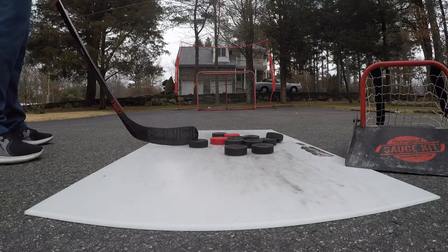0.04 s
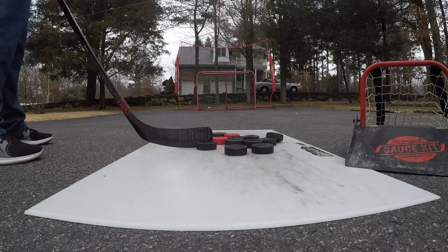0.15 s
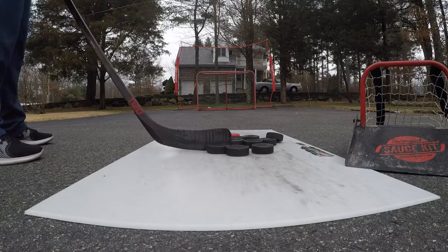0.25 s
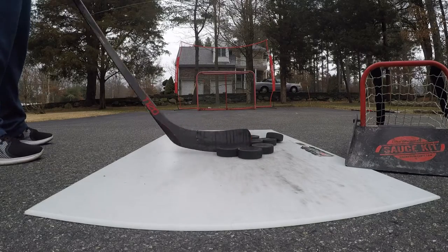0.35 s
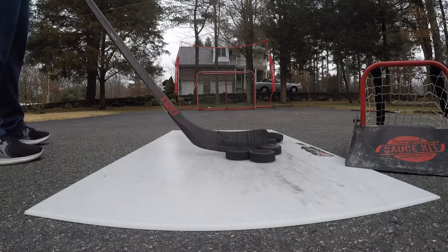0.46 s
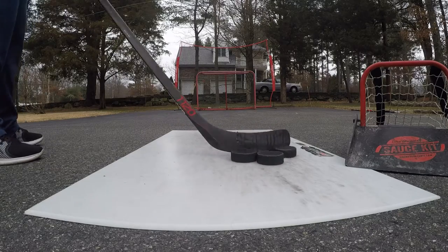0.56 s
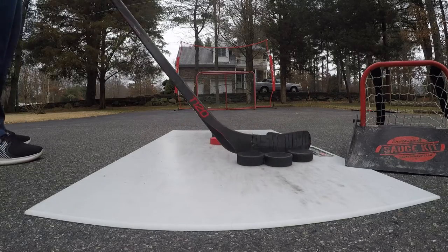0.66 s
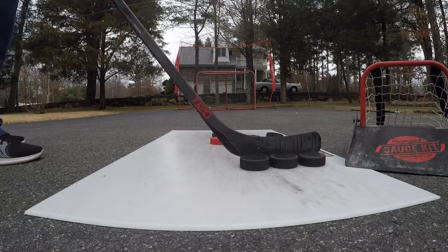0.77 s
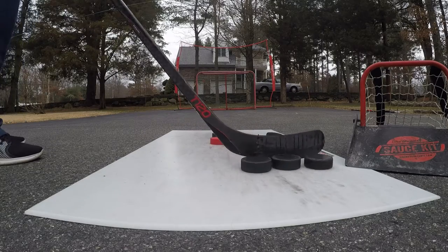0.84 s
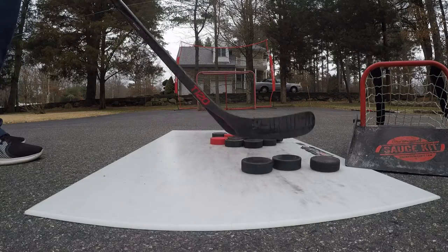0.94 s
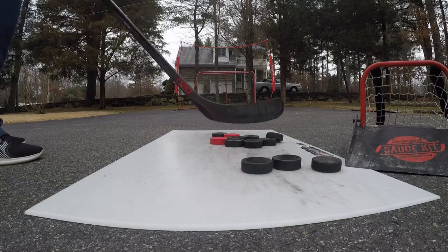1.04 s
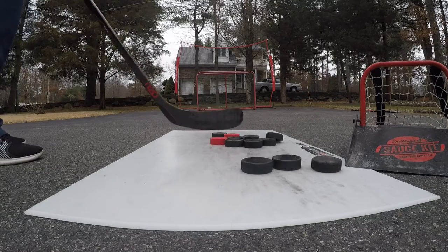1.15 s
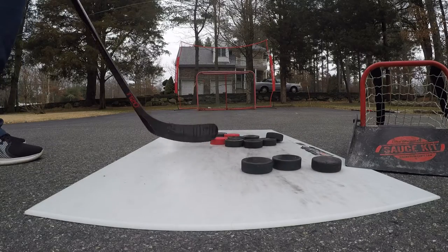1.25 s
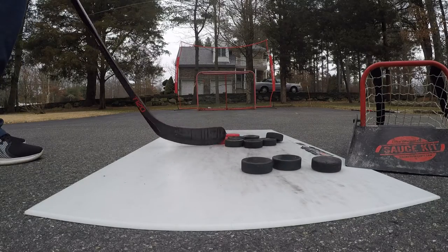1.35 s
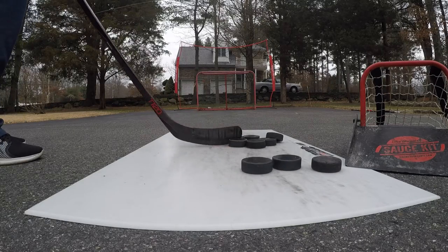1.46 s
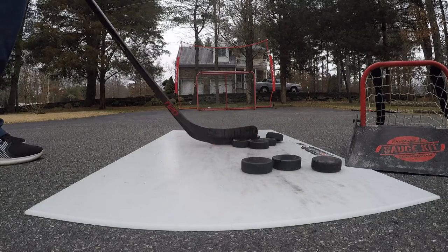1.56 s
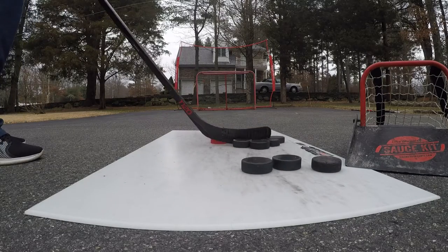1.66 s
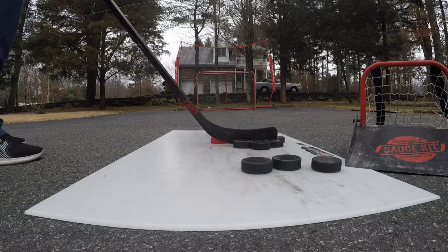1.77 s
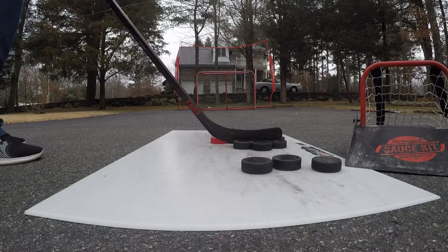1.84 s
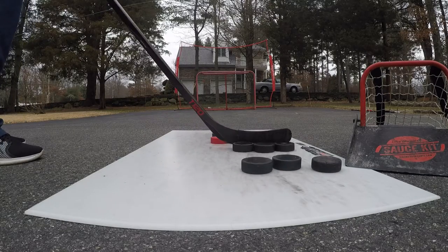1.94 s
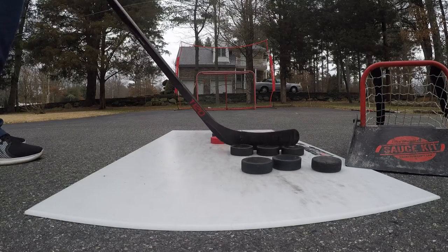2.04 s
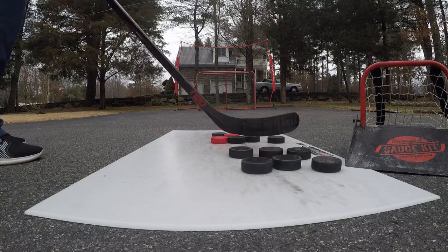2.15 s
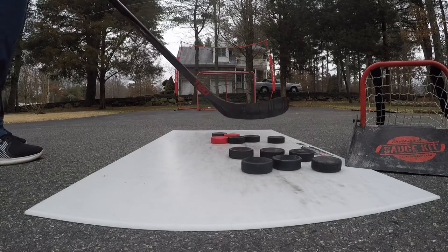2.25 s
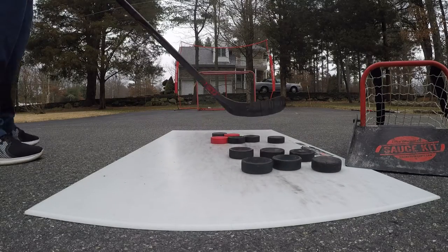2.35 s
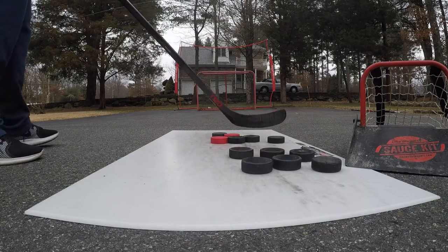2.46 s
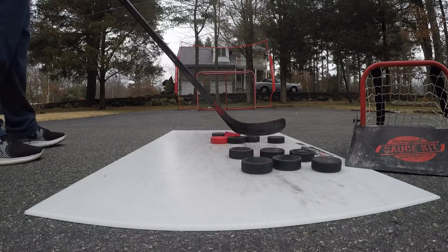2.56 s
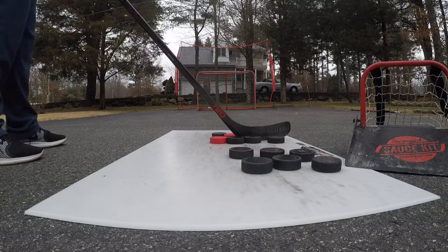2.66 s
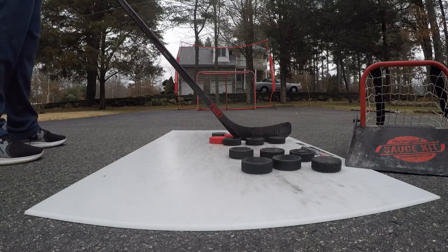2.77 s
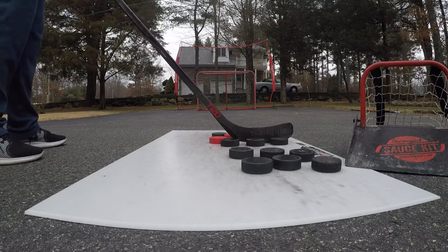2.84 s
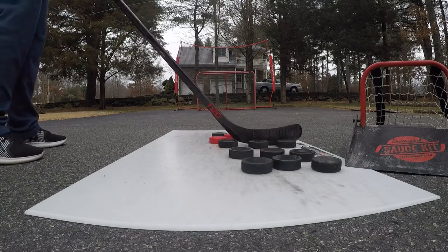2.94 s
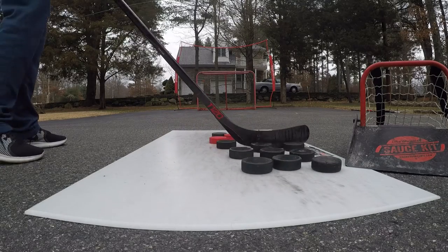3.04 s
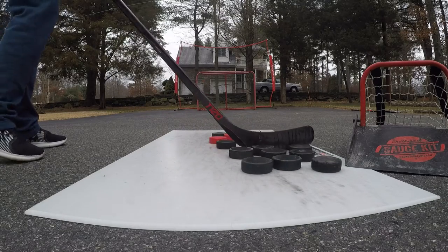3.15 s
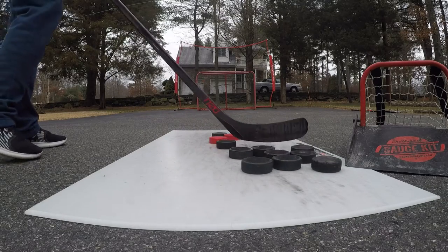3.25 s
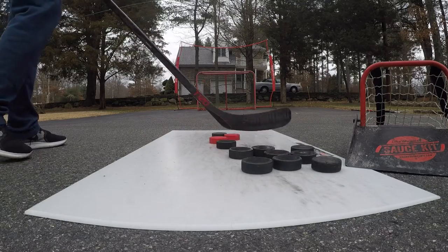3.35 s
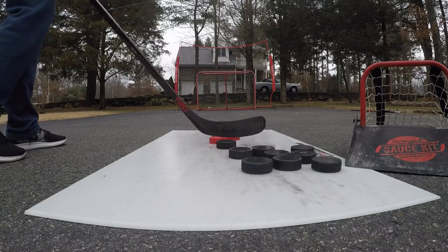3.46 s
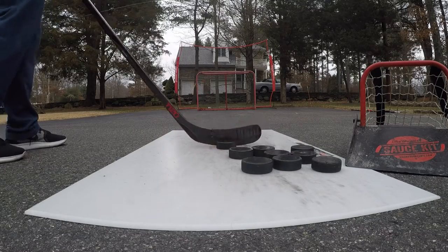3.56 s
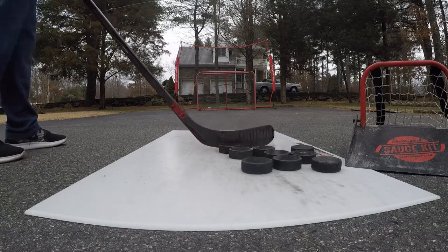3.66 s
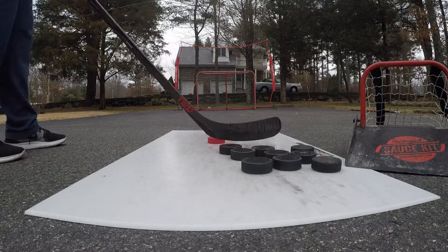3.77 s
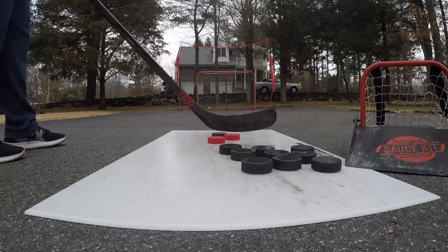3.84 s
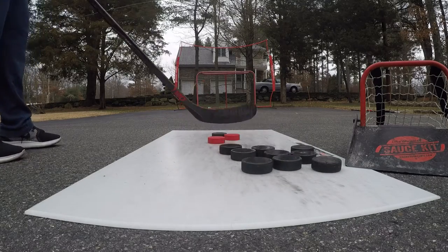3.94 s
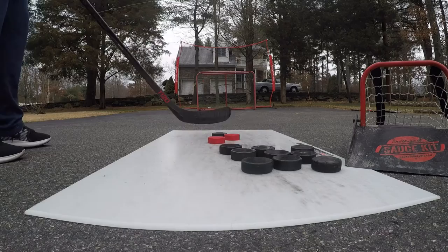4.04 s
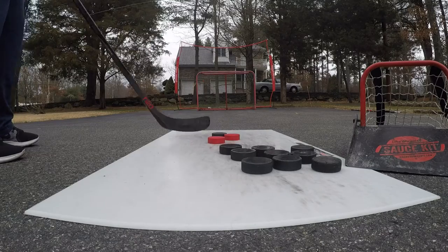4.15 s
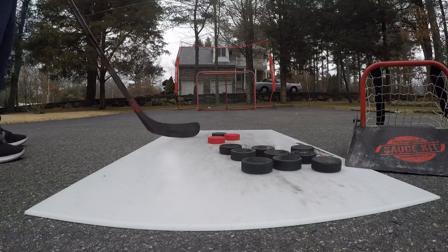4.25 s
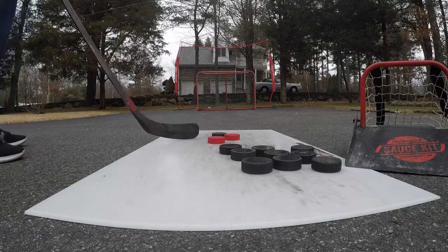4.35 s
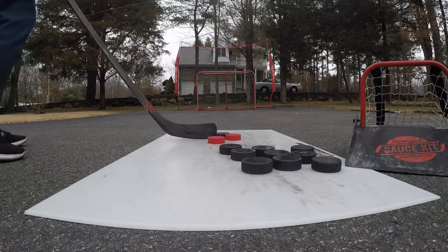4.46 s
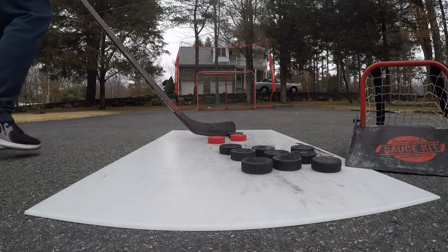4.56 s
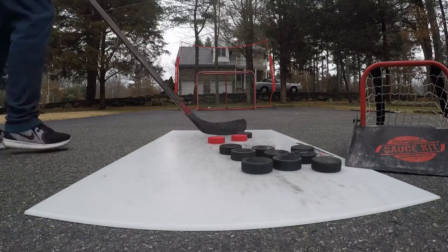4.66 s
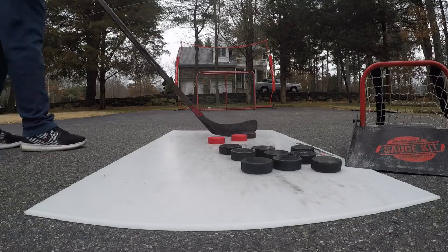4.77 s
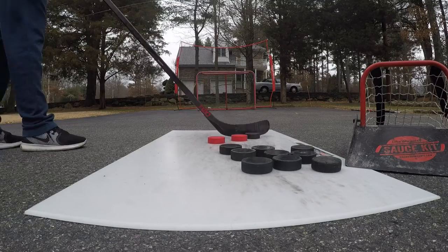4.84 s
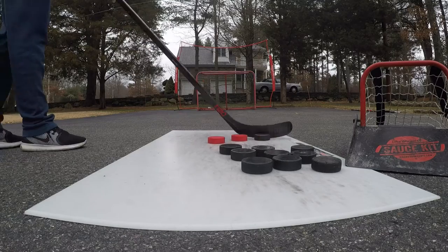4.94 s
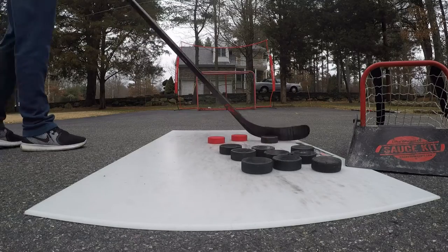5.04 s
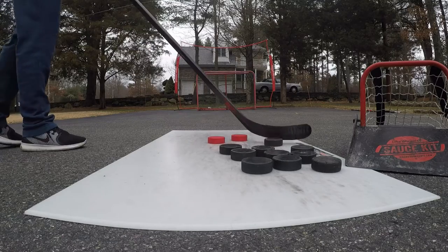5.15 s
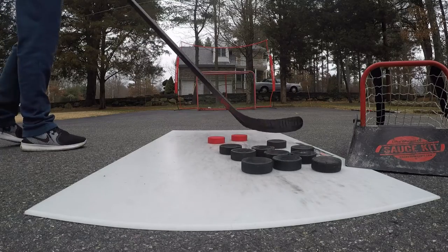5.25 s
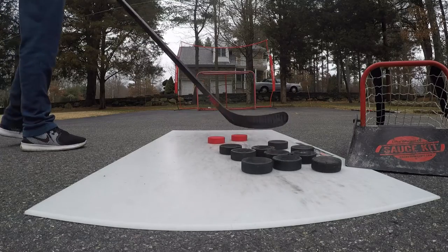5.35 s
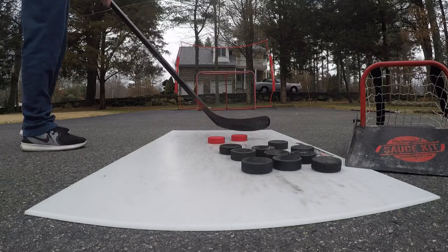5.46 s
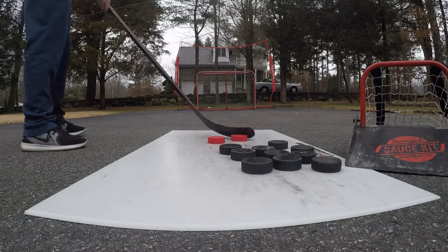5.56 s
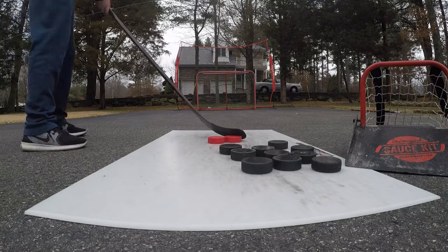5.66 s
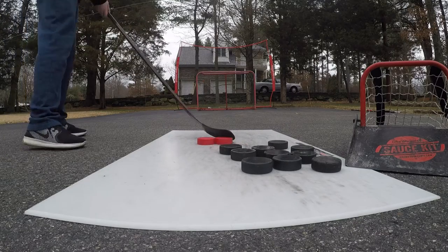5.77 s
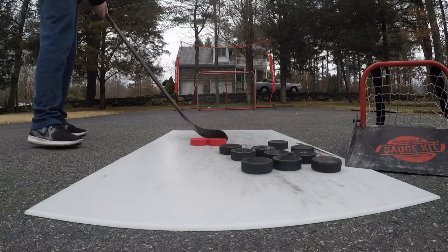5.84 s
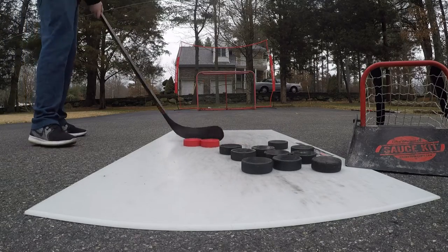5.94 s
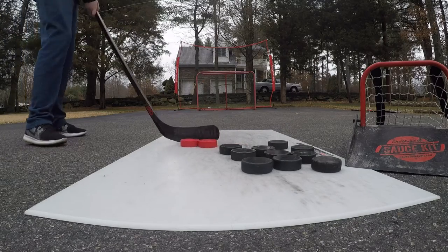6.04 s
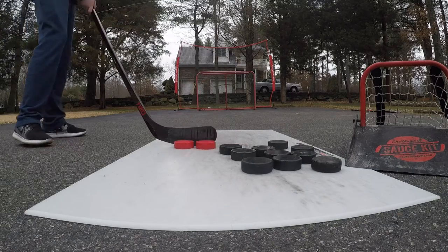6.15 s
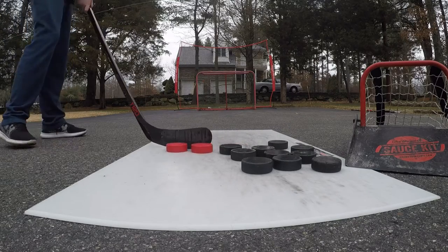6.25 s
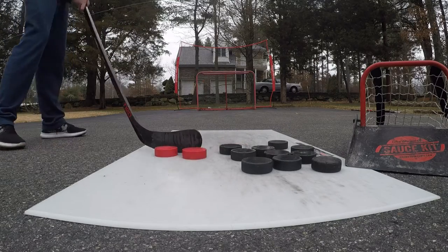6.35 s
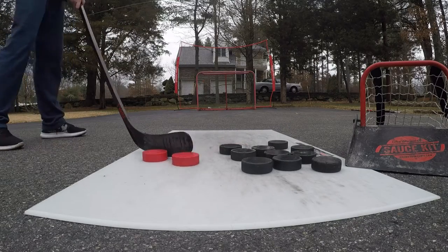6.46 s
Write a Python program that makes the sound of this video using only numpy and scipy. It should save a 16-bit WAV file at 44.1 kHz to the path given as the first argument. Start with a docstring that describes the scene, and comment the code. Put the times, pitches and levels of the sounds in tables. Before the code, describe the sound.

A hockey stick clacks sharply against rubber pucks and scrapes them over a slick plastic pad, with brief rubbery squeaks and faint distant traffic.

```python
"""A driveway: a hockey stick knocks rubber pucks and drags them over a plastic pad, near a small camera.
Each knock is a short blow that rings the stick and its hollow blade and sets off a rattle of noise.
Dragging is grainy hiss over a drone, with brief rubber squeals; far traffic hums under it all.
Two close microphone ports colour the near sounds; gain control, soft overload and a bass cut follow."""
import sys
import numpy as np
from scipy import signal
from scipy.fft import rfft, irfft
from scipy.io import wavfile
from scipy.ndimage import uniform_filter1d

SR = 44100
rng = np.random.default_rng(int(sys.argv[2]) if len(sys.argv) > 2 else 0)


def inscribe(sig):
    """Save sig as 16-bit PCM at rate SR to the path in sys.argv[1].

    A 1-D sig is mono; a 2-D sig holds one channel per row.
    Samples are clipped to [-1, 1] before scaling.
    """
    pcm = np.round(np.clip(np.atleast_2d(sig).T, -1, 1) * 32767)
    wavfile.write(sys.argv[1], SR, pcm.astype(np.int16))


N = 286635

# Lower, longer-ringing modes of the stick: (frequency [Hz], level [dB], 60 dB decay time [s])
LOW_MODES = [(207, 3, 0.041), (280, -4.5, 0.13), (420, -5, 0.15), (564, -3.5, 0.11), (620, -8.5, 0.079),
             (770, -4, 0.11)]
# Modes of the hollow blade: (frequency [Hz], level [dB], 60 dB decay time [s])
BLADE_MODES = [(960, -2, 0.075), (1050, -7, 0.05), (1240, -2.5, 0.017), (1480, 8, 0.011), (1750, 3, 0.035),
               (2160, -1, 0.02)]


def amp(db):
    """Turns decibels into a linear gain."""
    return 10 ** (np.asarray(db) / 20)


def evened(x):
    """Scales a signal to rms 1."""
    return x / np.sqrt(np.mean(x ** 2) + 1e-20)


def read(points, hz):
    """Reads a table of (frequency, value) along a logarithmic pitch axis."""
    f, value = np.transpose(points)
    return np.interp(np.log(hz + 1), np.log(f + 1), value)


def coloured(x, spectrum):
    """Filters x with the spectrum, falling 74 dB per octave outside the table, and evens it to rms 1."""
    hz = np.fft.rfftfreq(x.shape[-1], 1 / SR)
    octaves_outside = np.log2(np.clip(hz + 1, spectrum[0][0], spectrum[-1][0]) / (hz + 1))
    gain = amp(read(spectrum, hz) - 74 * abs(octaves_outside))
    return evened(irfft(rfft(x) * gain, x.shape[-1]))


def wander(size):
    """Slow chance of rms 1, smoothed twice over size samples."""
    smooth = uniform_filter1d(rng.standard_normal(N), size)
    return evened(uniform_filter1d(smooth, size))


def blended(a, b, same):
    """Mixes two independent noise spectra into a partner of a with the given likeness to it."""
    return same * a + np.sqrt(1 - same ** 2) * b


def ports(x):
    """The camera body shades and turns near sound differently at its two ports; noise pairs are blended."""
    # (frequency [Hz], left minus right [dB], left's phase lead [rad], left-right likeness of noise)
    port_table = np.array([(165, 1.8, -0.13, 0.7), (500, 3.5, 0.052, 0.81), (700, 5.5, -1.08, 0.8),
                           (880, -1, -0.64, 1), (1200, -5.5, -1.22, 0.84), (1500, -4.5, 0.38, 0.33),
                           (1750, -4.5, 0.57, 1), (2100, 1.5, 0.038, 0.64), (2690, -1, 0.69, 1),
                           (4670, 0.5, -1.03, 1), (6900, 2, -0.58, 0.18), (8100, -5.5, -0.37, 0.28),
                           (11700, 5, -0.86, .1)])
    n = x.shape[-1]
    hz = np.fft.rfftfreq(n, 1 / SR)
    db, turn, same = (read(port_table[:, [0, k]], hz) for k in (1, 2, 3))
    half = amp(db / 2) * np.exp(.5j * turn)  # each port takes half of the difference
    left = right = rfft(x)
    if x.ndim == 2:
        left, right = left[0], blended(left[0], left[1], np.clip(same, 0, 1))
    return irfft([left * half, right / half], n)


def traffic():
    """Far traffic is smooth, wide noise that swells slowly, with its bass in lumps."""
    # Colour of the noise: (frequency [Hz], relative level [dB])
    colour = [(20, 7), (100, -6), (160, -6), (250, -12), (400, -17), (640, -17.5), (1050, -14),
              (1700, -19.5), (2200, -29.5), (2800, -32.5), (4800, -38), (9000, -38.5), (10500, -40.5),
              (15000, -54.5)]
    # Slow swell: (time [s], level [dB])
    swell = [(0, -34.5), (.8, -35.5), (1.3, -35.5), (1.9, -37.5), (2.5, -37.5), (3.4, -38), (4.1, -37.5),
             (5.4, -37), (6.5, -35)]
    # Stereo width: (frequency [Hz], left-right likeness)
    likeness = [(60, 0.37), (130, 0.95), (290, 0.51), (640, -0.19), (1410, 0.065), (3100, 0.11),
                (6820, -0.03), (15000, -0.27)]
    a, b = rfft(rng.standard_normal((2, N)))
    same = np.clip(read(likeness, np.fft.rfftfreq(N, 1 / SR)), -1, 1)
    pair = coloured(irfft([a, blended(a, b, same)], N), colour)
    bass = signal.filtfilt(*signal.butter(2, 350, fs=SR), pair)
    lumpy_bass = bass * amp(2.5 * wander(size=700))
    level_db = np.interp(np.arange(N) / SR, *np.transpose(swell))
    return amp(level_db) * (pair - bass + lumpy_bass)


def yard(x, t60):
    """Scattered returns from ground, goal and walls differ at each port; small things return no bass."""
    t = np.arange(8000) / SR
    sparse = rng.random((2, len(t))) < .06
    taps = rng.standard_normal((2, len(t))) * sparse * amp(-60 * t / t60) * (t > .002)
    taps = signal.lfilter(*signal.butter(2, 500, "high", fs=SR), taps)
    return signal.oaconvolve(x, taps / np.linalg.norm(taps[0]), axes=1)[:, :N]


def patchy(x, patch_db):
    """As the contact shifts, colour drifts in patches of some hundred Hz by some ten ms."""
    z = signal.stft(x, nperseg=256, noverlap=192)[2]
    patches = uniform_filter1d(rng.standard_normal(z.shape[1:]), size=2, axis=0)
    for _ in range(2):
        patches = uniform_filter1d(patches, size=14, axis=1)
    shifted = z * amp(patch_db * evened(patches))
    return evened(signal.istft(shifted, nperseg=256, noverlap=192)[1][:, :N])


def strokes():
    """Gains of hiss and drone: each pull moves through its fastest point to lift-off; the drone swings less."""
    # Pulls: (touch [s], fastest [s], lift [s], hiss at touch [dB], hiss when fastest [dB],
    #         hiss at lift [dB], drone when fastest [dB])
    pulls = [(0.121, 0.268, 0.66, -41, -35, -42, -40), (0.67, 0.75, 0.9, -43, -40, -47.5, -43),
             (1.367, 1.417, 1.637, -46, -43.5, -49, -45.5), (1.79, 2.002, 2.28, -53, -34.5, -55, -39.5),
             (2.296, 2.43, 3.5, -57, -58, -57, -63), (2.707, 3.14, 3.18, -46.5, -38.5, -45, -41),
             (3.613, 3.665, 3.78, -46, -41.5, -51, -44), (4.26, 4.507, 4.787, -56.5, -41.5, -53.5, -46.5),
             (4.856, 4.997, 5.27, -47.5, -38.5, -50.5, -41),
             (5.58, 5.894, 5.96, -50.5, -41.5, -40.5, -46.5), (6.1, 6.306, 6.62, -50, -38.5, -35.5, -42.5)]
    touch_db_per_s, lift_db_per_s = 506, 150  # slopes before touch and after lift
    bend, drone_share = 1.57, 0.71  # curve of the change in level; the drone's part of the hiss's swing
    t, hiss_power, drone_power = np.arange(N) / SR, np.zeros(N), np.zeros(N)
    for touch, fastest, lift, touch_db, top_db, lift_db, drone_db in pulls:
        early, late = (np.clip((t - fastest) / (s - fastest), 0, 1) ** bend for s in (touch, lift))
        slower_db = (touch_db - top_db) * early + (lift_db - top_db) * late
        off_db = touch_db_per_s * np.maximum(touch - t, 0) + lift_db_per_s * np.maximum(t - lift, 0)
        swing_db = slower_db - off_db
        hiss_power += amp(2 * (top_db + swing_db))
        drone_power += amp(2 * (drone_db + drone_share * swing_db))
    return np.sqrt(hiss_power), np.sqrt(drone_power)


def squeals():
    """Rubber catches and squeals briefly: narrow noise, broken up as it grips and lets go."""
    # (start [s], length [s], pitch [Hz], width between -4 dB points [Hz], level before breakup and fades [dB])
    squeal_table = [(0.744, 0.051, 3400, 350, -39), (0.75, 0.025, 1840, 250, -40),
                    (0.825, 0.033, 1750, 252, -43), (2.205, 0.092, 5670, 300, -47.5),
                    (2.916, 0.024, 2450, 300, -40), (2.926, 0.065, 2100, 300, -42),
                    (2.928, 0.04, 1600, 350, -40), (2.997, 0.054, 1740, 400, -42),
                    (2.992, 0.049, 3880, 300, -42.5), (2.973, 0.021, 1680, 200, -42),
                    (3.674, 0.02, 1730, 250, -39.5), (4.385, 0.034, 6200, 500, -49),
                    (4.923, 0.049, 2500, 200, -42), (4.958, 0.065, 2100, 300, -44),
                    (5.002, 0.036, 1670, 350, -39), (5.036, 0.083, 1860, 200, -38.5),
                    (5.11, 0.08, 1500, 500, -43)]
    out = np.zeros(N)
    slips = evened(amp(3 * wander(size=25)))
    for s, length, hz, width, db in squeal_table:
        band = [(hz - width / 2, -4), (hz, 0), (hz + width / 2, -4)]
        tone = coloured(rng.standard_normal(round(length * SR)), band)
        at = slice(round(s * SR), round(s * SR) + len(tone))
        out[at] += amp(db) * tone * slips[at] * np.hanning(len(tone))
    return out


def drag():
    """Grit under rubber and blade makes dense tiny slips: bright hiss over a lower drone, and squeals."""
    # Colour of the grit's hiss: (frequency [Hz], relative level [dB])
    hiss_colour = [(1350, -13), (2300, -19), (3350, -8), (3740, -4), (4880, -8), (5760, -3), (6740, -3),
                   (7460, -6), (9010, -7.5), (10100, -18.5), (11600, -44), (15000, -37)]
    # Colour of the drone: (frequency [Hz], relative level [dB])
    drone_colour = [(94, -26), (160, -11), (547, -10), (753, -7), (868, -7), (1330, -3), (1460, -5.5),
                    (1640, -1), (2700, -8), (3510, -15.5), (5940, -120)]
    hiss_gain, drone_gain = strokes()
    grain_db = 2.2 * np.minimum(rng.exponential(1, N), 6) + 1.1 * wander(size=200)
    grit = rng.standard_normal((2, 2, N)) * amp(grain_db)
    out = hiss_gain * patchy(coloured(grit[0], hiss_colour), 2.4)
    out += drone_gain * patchy(coloured(grit[1], drone_colour), 2.8)
    return ports(out + squeals())


EVEN_HZ = 700  # middle pitch of a blow


def blow(t, hz, swing):
    """The surface is squeezed quickly and springs back slower: a bent cosine that peaks at contact."""
    lead_in, squeeze = 0.46, 0.22  # cycles of dip ahead of a middle blow; how much quicker a dead blow closes
    after = np.maximum(t, 0)
    bend = np.where(t < 0, 1 + squeeze / swing ** 2, 1 / (1 + 0.39 * after * hz / swing ** 2))
    cycles = t * hz * bend
    width = np.where(t < 0, lead_in * (EVEN_HZ / hz) ** 0.096, 0.9 * swing)
    return np.cos(2 * np.pi * cycles) * np.exp(-(cycles / width) ** 2 - 0.42 * after * hz)


def shell_snap(t):
    """The blade's shell pings at first contact, just ahead of the blow's peak."""
    lead_s, rise_s, fall_s = .0005, .00025, .0006
    since = t + lead_s
    return np.cos(2 * np.pi * 5500 * since) * np.exp(-abs(since) / np.where(since < 0, rise_s, fall_s))


def ringing(t, ring_hz, chance):
    """The blow sets off decaying sines of stick and blade; modes near the most rung pitch are strongest."""
    lowest_hz, lowest_db = 330, -3  # modes below this ring at any blow, weakened by no more than this
    hz, db, t60 = np.transpose(LOW_MODES + BLADE_MODES)[:, :, None]
    db = db + 1.5 * chance[:, :1]
    hz = hz * (1 + .012 * chance[:, 1:])  # each knock detunes the modes a little
    away_db = -16 * abs(np.log2(hz / ring_hz))  # dB per octave away from the most rung pitch
    away_db = np.where(hz < lowest_hz, np.maximum(away_db, lowest_db), away_db)
    return -(amp(db + away_db - 60 * t / t60) * np.sin(2 * np.pi * hz * t)).sum(0)


def rattle_fade(after, hz):
    """Loose contacts start within a millisecond or so and thin out; high blows of the blade rattle on longer."""
    t60 = 0.079 * (hz / EVEN_HZ) ** 0.13  # seconds
    return (1 - np.exp(-after / 0.0012)) * amp(-60 * after / t60)


def knocks():
    """Stick and pucks collide: blow, crack, rings of stick and blade, and a rattle of loose contacts."""
    # Levels before port colouring: (time [s], blow peak [dB], blow pitch at its peak [Hz],
    #  swing [1 dead, 3 springy], ring [dB], most rung pitch [Hz], crack reference [dB], rattle [dB],
    #  rattle treble [dB], added left minus right [dB])
    knock_table = [(.0067, -7, 1500, 1.24, -29, 940, -27, -21.5, -32, 1),
                   (0.0848, -8.5, 795, 0.8, -18, 760, -39, -25, -34.5, 0),
                   (0.087, -20, 900, 0.6, -24, 1300, -41, -27, -50, 6),
                   (.119, -11.5, 760, 0.8, -26, 760, -46, -43, -58, 0),
                   (0.1215, -20, 800, 1, -32, 760, -50, -45, -60, 4),
                   (0.2836, -13, 770, 1.1, -22.5, 770, -31, -33, -42, 0),
                   (0.434, -10.5, 1550, 11, -23.5, 770, -44, -26, -52, -1.5),
                   (0.4354, -19, 1510, 3.3, -29, 567, -46, -30, -54, 6),
                   (0.7911, -7.5, 910, 1.22, -24.5, 650, -31, -34, -51, -1),
                   (1.3033, -27, 700, 0.83, -30, 570, -29, -30, -42, .5),
                   (1.3396, -12, 1200, 1.15, -30, 960, -39, -26.5, -39.5, 0),
                   (1.411, -30, 390, 1.2, -30, 292, -45, -38, -55, .6),
                   (1.731, -1, 1670, 1.68, -28, 760, -9, -26, -35, -5),
                   (1.977, -22, 1600, 2.1, -48, 1500, -43, -53, -46, -3),
                   (2.0209, -14.5, 607, 0.93, -24, 315, -33, -29, -45, -0.5),
                   (2.5417, -12, 1220, 0.84, -32, 960, -26, -17.5, -26, -4),
                   (2.544, -8, 1540, 5.4, -29, 1480, -12, -45, -47, 1),
                   (2.5499, -35, 1180, 1, -34, 970, -16, -38, -44, 0),
                   (2.5522, -13, 1190, 2.8, -28.5, 1050, -18.5, -30, -53, 6),
                   (2.566, -40, 650, 0.87, -33, 570, -39, -28, -59, 0),
                   (2.6614, -16, 1090, 4, -33, 1050, -22, -29, -45, -1.2),
                   (2.682, 0.5, 870, 0.52, -18.5, 280, -25, -22, -34, -1),
                   (2.6843, -10, 700, 0.44, -23, 1000, -19, -46, -41, 1),
                   (2.7123, -20, 560, 1, -23, 330, -37, -24, -36, -1.5),
                   (2.75, -24, 440, 3, -26.5, 287, -31, -30, -39, 0.5),
                   (2.7898, -6.5, 880, 0.99, -24, 950, -43, -38, -55, -2),
                   (2.8232, -20, 730, 0.7, -33, 415, -49, -49, -55, -1),
                   (2.8872, -22.5, 500, 2.1, -31, 346, -48, -34, -60, -1),
                   (2.901, -28, 480, 0.84, -43, 420, -47, -57, -51, 1),
                   (3.1671, -15, 535, 4.2, -24, 325, -32, -29, -40, -0.5),
                   (3.2273, -23, 990, 1.6, -44, 960, -34, -56, -43, -10),
                   (3.509, -14.5, 1090, 1.6, -32, 900, -21, -24, -30.5, 1.5),
                   (3.513, -18, 895, 3.2, -29, 650, -28, -26, -40, 4),
                   (3.5155, -20, 1400, 1.74, -27, 1300, -30, -38, -44, 0),
                   (3.5228, -20, 1300, 2.2, -39, 1050, -32, -44, -48, 0),
                   (3.5193, -23, 1240, 1.5, -37, 1240, -21, -34, -43, -7),
                   (3.5379, -21, 710, 0.75, -47, 753, -25, -34, -61, 2),
                   (3.5873, -0.5, 714, 0.83, -18, 596, -21.5, -25, -35, 0),
                   (3.6399, -10.5, 660, 1.16, -25, 580, -45, -35, -51, 0.5),
                   (3.6535, -26, 490, 1.5, -44, 415, -45, -49, -48, -1),
                   (3.7601, -25, 770, 1.85, -50, 574, -31, -61, -53, -2),
                   (3.993, -35, 1500, 0.49, -62, 1500, -45, -56, -49, 6),
                   (4.051, -38, 1500, 0.72, -59, 1500, -45.5, -50, -55, 6),
                   (4.2663, -9, 1670, 3, -38, 1500, -40, -30.5, -45, 1),
                   (4.2678, -21, 1700, 2.1, -34.5, 1750, -40, -35.5, -50, -1),
                   (4.2689, -19, 1800, 2, -49, 1750, -46, -39, -50, 0),
                   (4.274, -28, 1300, 2.2, -36, 900, -45, -43, -51, 7),
                   (4.4722, -15.5, 656, 1.4, -23.5, 415, -48, -26.5, -47, 0),
                   (4.479, -39, 600, 0.61, -46, 570, -29, -42, -46, -1),
                   (4.4855, -18, 613, 0.73, -32, 760, -44, -35, -57, 4),
                   (4.7657, -19.5, 1340, 2.5, -34, 760, -40, -28, -44, 1),
                   (4.861, 1.5, 920, 0.76, -16.5, 420, -17.5, -39, -35, -1),
                   (4.8639, -7.5, 1500, 0.87, -19, 1060, -36, -35, -39, 4),
                   (4.917, -24, 540, 1.7, -27.5, 285, -39, -49, -36, -2),
                   (5.5693, -4, 2000, 1.2, -44, 1750, -25, -25, -28, -2.5),
                   (5.5852, -25, 1500, 1.5, -45, 1500, -35, -39, -48, 0),
                   (5.595, -20, 610, 0.78, -33, 570, -50, -33, -67, 1),
                   (5.711, -20.5, 700, 1.44, -37, 571.7, -20.5, -38.5, -59, 0),
                   (5.738, -32, 600, 1.5, -50, 570, -55, -46, -60, 2),
                   (5.975, -32, 1200, .82, -44, 1200, -25.5, -43, -38.5, 12),
                   (6.001, -42, 1300, 0.82, -46, 1200, -25.5, -46, -46, 8),
                   (6.0866, -7.5, 900, 0.64, -27, 500, -37, -36, -39, 1),
                   (6.0887, -25, 524, 1.9, -26, 564, -48, -47, -55, 1.5),
                   (6.1151, -14.5, 760, 0.77, -43, 568, -48, -34, -49, 1),
                   (6.1329, -26, 700, 0.95, -44, 415, -51, -54, -51, -.6),
                   (6.1808, -23.5, 805, 0.61, -35, 332, -52, -42, -60, 1)]
    # Rattle after soft blows: (frequency [Hz], relative level [dB])
    dull_colour = [(200, 14.5), (450, 0), (800, 17), (1300, 12), (2200, 9.5)]
    # Rattle after hard blows: (frequency [Hz], relative level [dB])
    body_colour = [(200, -1), (500, 2), (1000, 4.5), (1500, 1.5), (2200, -4.5), (2800, -20)]
    # Treble of rattle and crack: (frequency [Hz], relative level [dB])
    top_colour = [(1530, -48), (2600, -1), (3900, 2), (4710, -5), (5700, -2), (9250, -7.5), (10900, -29),
                  (15000, -43)]
    out, t = np.zeros((2, N + 12000)), np.arange(-200, 8000) / SR  # 200 samples of lead-in
    after = np.maximum(t, 0)
    chances = rng.standard_normal((len(knock_table), len(LOW_MODES + BLADE_MODES), 2))
    lumps = amp(1.6 * wander(size=40))  # the rattle comes in bursts of a millisecond or two
    colours = (dull_colour, body_colour, top_colour)
    noises = [ports(coloured(rng.standard_normal(out.shape), colour)) for colour in colours]
    snap = shell_snap(t)
    ring_rise = 1 - np.exp(-after / 0.000083)
    crack_shape = np.exp(-abs(t + 0.00015) / np.where(t < -.0004, .0004, .0008))
    for knock, chance in zip(knock_table, chances):
        s, blow_db, hz, swing, ring_db, ring_hz, crack_db, rattle_db, top_db, pan_db = knock
        here = np.arange(len(t)) + round(s * SR)
        dull, body, top = (noise[:, here] for noise in noises)
        solid = amp(blow_db) * blow(t, hz, swing)
        solid += ring_rise * amp(ring_db) * ringing(after, ring_hz, chance)
        solid += amp(crack_db + 2) * snap
        hard = np.clip((hz - 450) / 600, 0, 1)  # higher blows count as harder
        fade = rattle_fade(after, hz) * np.take(lumps, here, mode="wrap")
        loose = fade * amp(rattle_db) * (np.sqrt(hard) * body + np.sqrt(1 - hard) * dull)
        crack = amp(crack_db - 5) * crack_shape
        treble = (crack + fade * amp(top_db)) * top
        out[:, here] += (ports(solid) + loose + treble) * amp([[pan_db / 2], [-pan_db / 2]])
    return out[:, 200:N + 200]


def scene():
    """Sums traffic, drags and knocks, with the yard's returns of the knocks."""
    hits = knocks()
    return traffic() + drag() + amp(-19.5) * yard(hits, 0.031) + hits


def record(dry):
    """Gain control ducks at loud peaks and recovers; soft overload, a steep bass cut, then the band limit."""
    # Bass cut: (frequency [Hz], gain [dB])
    bass_cut = [(20, -34), (108, -27), (125, -20.5), (145, 1.5)]
    power_db = 10 * np.log10(abs(uniform_filter1d((dry ** 2).mean(0), size=200)) + 1e-12)
    fall = np.arange(N) * 60. / SR  # the level detector falls 60 dB a second
    held_db = np.maximum.accumulate(power_db + fall) - fall
    over_db = np.maximum(held_db + 17.5, 0)
    ducked = dry / amp(0.45 * uniform_filter1d(over_db, size=200))
    rounded = .95 * np.tanh(ducked / .95)  # the input stage rounds the highest peaks
    cut = irfft(rfft(rounded) * amp(read(bass_cut, np.fft.rfftfreq(N, 1 / SR))), N)
    band_limit = signal.firwin(511, 15250, window=("kaiser", 9), fs=SR)  # low-pass edge in Hz
    return signal.oaconvolve(cut, band_limit[None], "same")


dry = scene()
out = record(dry)
inscribe(out)
```